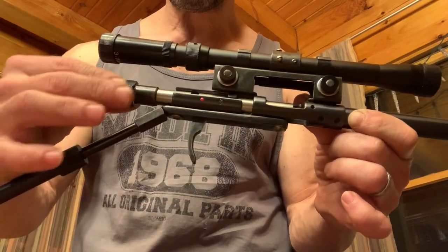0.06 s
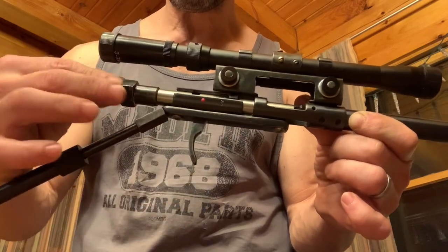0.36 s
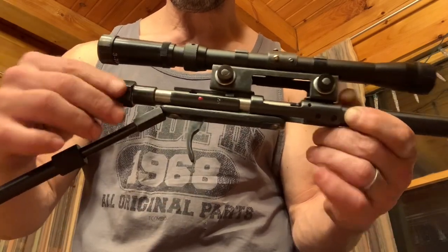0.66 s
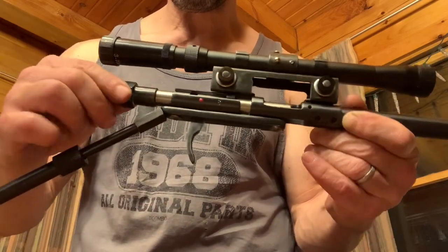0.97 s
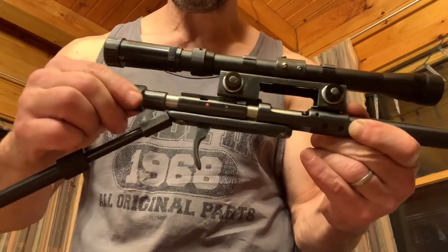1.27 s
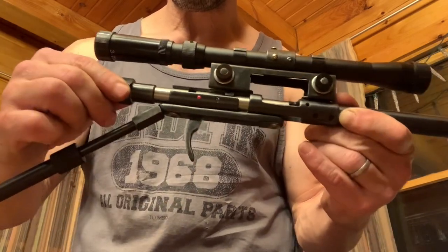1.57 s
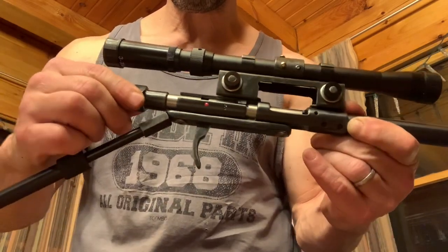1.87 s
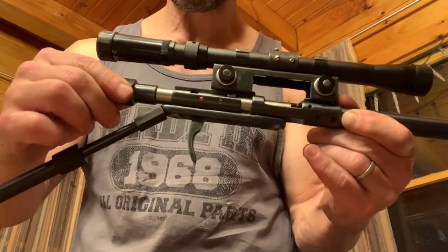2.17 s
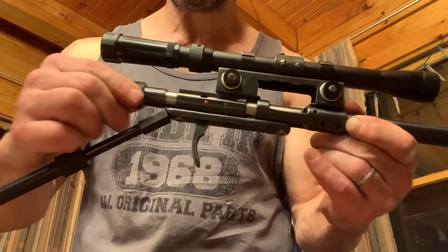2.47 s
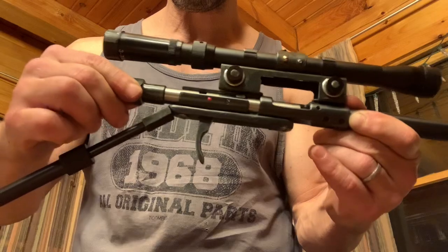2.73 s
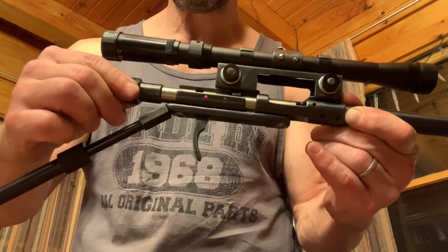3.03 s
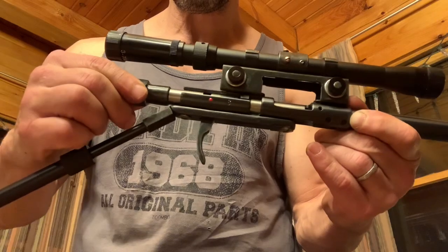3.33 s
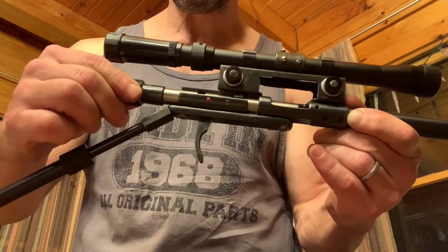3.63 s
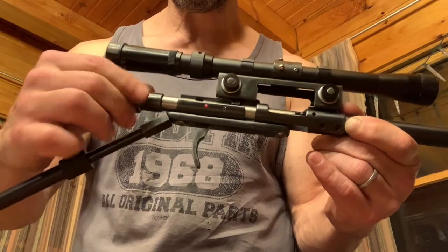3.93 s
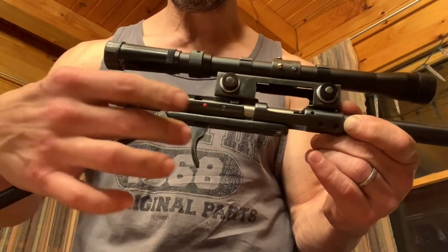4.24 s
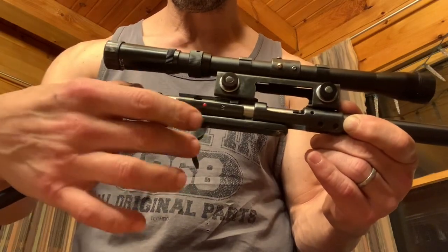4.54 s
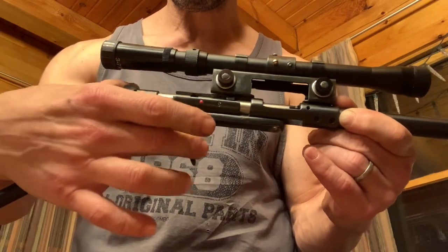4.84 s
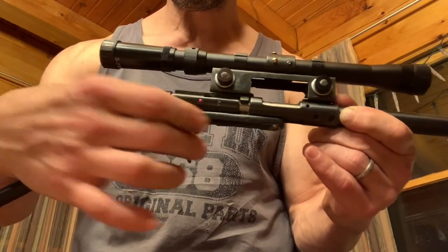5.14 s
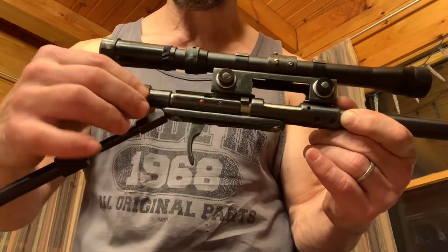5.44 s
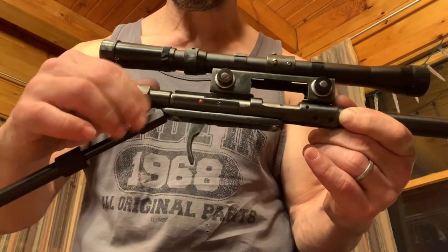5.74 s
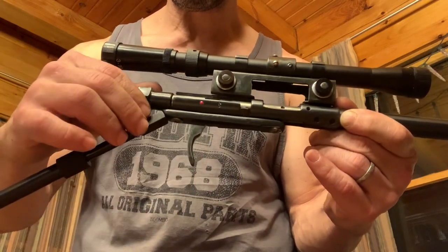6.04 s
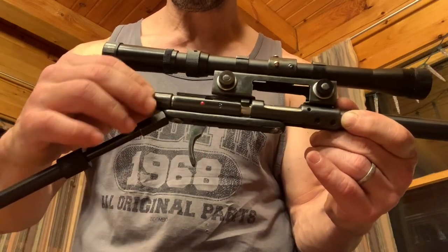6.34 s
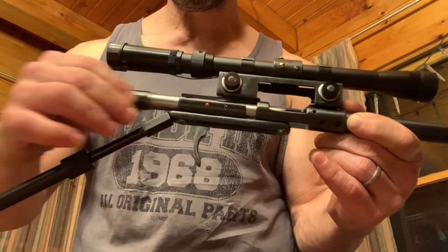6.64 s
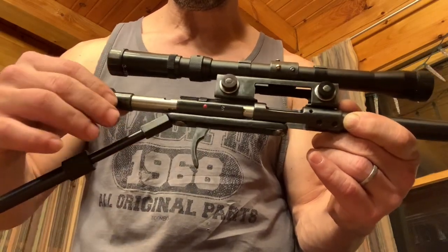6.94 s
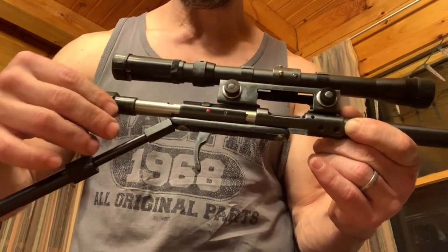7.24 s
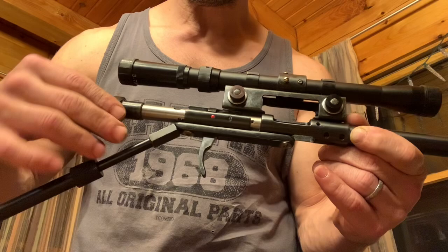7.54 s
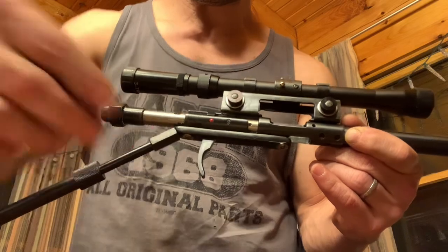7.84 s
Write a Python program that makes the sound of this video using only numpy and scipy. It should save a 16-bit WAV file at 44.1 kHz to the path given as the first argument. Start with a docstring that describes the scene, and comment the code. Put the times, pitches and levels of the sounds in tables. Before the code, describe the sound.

A rifle bolt is eased forward by hand, close to the microphone in a small wooden room. Steel slides softly with light clicks and dull knocks from the held rifle. The bolt closes with a hard click, another click and a very sharp snap follow, then it scrapes open and is drawn back. A faint bird chirps now and then, and a low hum comes and goes over a quiet, steady drone.

```python
"""A rifle bolt is worked by hand, close by, in a small wooden room with a quiet, steady drone.
First the bolt is eased forward: steel slides, clicks and rings, and the held rifle knocks softly.
From half a second on, a faint bird chirps now and then; from about 2 s a low hum comes and goes.
Near 5 s the bolt closes with a hard click, and the sharpest snap follows at 6.2 s.
Last, the opened bolt scrapes past its catch and is drawn back."""
import sys
import numpy as np
from scipy import signal
from scipy.fft import rfft, irfft, next_fast_len
from scipy.io import wavfile
from scipy.ndimage import uniform_filter1d

SR = 44100
rng = np.random.default_rng(int(sys.argv[2]) if len(sys.argv) > 2 else 0)


def generate_wav(signal):
    """Clip the signal to [-1, 1] and save it as 16-bit WAV at the path in sys.argv[1]."""
    frames = np.transpose(np.atleast_2d(signal))
    scaled = np.clip(frames, -1, 1) * 32767
    pcm = np.round(scaled).astype(np.int16)
    wavfile.write(sys.argv[1], SR, pcm)


N = 352800  # 8 seconds

# Steel hits steel. Brightness is the high tick compared with the middle clack.
# Slack runs from 0 (bolt locked) to 1 (bolt loose).
# start_s, level_db, bright_db, ring_db, slack, ping_hz, ping_db, top_treble_db
BOLT_CLICKS = [(1.178, -54, -14, -8, 0.9, 7300, -8, -6), (1.805, -48.5, -13, -6, 0.56, 8000, 0, 2),
               (1.971, -44.5, -2.5, -10, 0.71, 7360, 3, -4), (2.487, -44.5, -6, -15, 0.4, 7800, 5, 0),
               (2.4963, -42.5, -10, 1, 0.31, 7900, 10, -7), (3.7695, -46, -11, 0, 0.43, 7450, 5, -6),
               (4.476, -45, -1, -2, 0.17, 7730, 5, -4), (4.695, -44, 5.5, -4.5, 0.26, 9080, 6.5, -2),
               (4.96, -37.5, 10, -6, 0.29, 8900, -2, 2), (4.9907, -45, 17.5, -11, 0.11, 9610, 1.5, -4),
               (4.9933, -24, 7.5, -4, 0.055, 9650, 6, 3), (5.09, -41, 11.5, -11.5, 0.25, 9540, 1, 4),
               (5.6407, -28, -9, -10.5, 0.4, 8800, 1, 1.5), (5.7242, -35, -14.5, 6.5, 0.85, 9200, -3, -13),
               (5.7472, -42.5, -10.5, -5, 0.85, 8600, -5, -8), (6.201, -18.5, 2.5, 0, .025, 9560, 10.5, 3),
               (6.594, -28, 8, 10.5, 1, 9060, 10.5, 2.5), (6.704, -58, 10, -11, 0.7, 13000, 9, 1),
               (6.7144, -44, 7, -3, .62, 9600, 17, 1), (6.715, -55, 17, -9, 0.58, 12660, 7, 6),
               (7.274, -60.5, 3, -9.5, 0.65, 8760, -6, -2)]
# The tones the steel rings with. A t60 is the time a sound takes to fade by 60 dB.
# pitch_hz, locked_db, loose_db, t60_s
STEEL_TONES = [(630, -0.5, -15, 0.059), (805, -15, -11.5, .03), (1580, -25.5, -9, 0.036),
               (1940, -9, -28, 0.028), (2610, 1, -19, 0.054), (2880, -8.5, -21.5, 0.034),
               (2995, -11.5, -21, 0.022), (3740, -21, -5, 0.054), (5700, -18.5, 0.5, 0.013),
               (7000, -11.5, -30, .03), (7200, -11, -35, 0.025), (7790, -13.5, -28, 0.025),
               (8600, -10, -1, 0.0079), (10530, -13.5, -5, 0.034), (11010, -13, 2.5, 0.03),
               (12560, -5, 2, 0.011), (13480, -16.5, 0.5, 0.017), (15050, -7, -3.5, 0.016)]
# How strong the rattle in a click is, from bass to treble: pitch_hz, locked_db, loose_db
RATTLE_SHAPE = [(100, -28, -30.5), (298, -13.5, -19.5), (580, -0.5, -4), (775, -4.5, -3.5),
                (1180, -13.5, -11), (1610, -7.5, -2.5), (1840, -2, -12), (2150, -19, -11),
                (2600, 3.5, -2.5), (3110, -8.5, -6.5), (3750, -5, 6.5), (4700, -11.5, -5), (4870, -4, 3),
                (5730, -10, 1.5), (6850, -1.5, -4.5), (8350, -1, -7), (8660, 1, -0.5), (10100, -11.5, -6),
                (10800, -10.5, -5.5), (16000, -14, -5.5)]
CLICK_S = 0.35
THUD_DB, THUD_PER_BRIGHT = -12, -0.21  # a bright, glancing click has less thud
SNAP_DB, SNAP_PER_BRIGHT = 32, 0.4  # and more snap

# The bolt slides along its guide: start_s, rise_s, fade_s, level_db, centre_hz, width_octaves
BOLT_STROKES = [(.149, 0.014, 0.125, -43.5, 3470, 1.1), (0.402, 0.01, 0.03, -59, 2900, 0.81),
                (.44, .03, .05, -56, 3200, .95), (1.45, 0.088, 0.28, -66.5, 1860, 0.94),
                (1.756, 0.029, 0.023, -62.5, 2920, 0.84), (1.97, 0.07, 0.15, -58.5, 3660, 1),
                (2.317, 0.0026, 0.06, -58, 2350, 0.62), (2.462, 0.033, 0.0095, -53, 3300, 1.1),
                (3.228, 0.0093, 0.063, -63.5, 2740, 0.6), (3.77, 0.15, 0.29, -63.5, 1620, 0.54),
                (4.653, .0034, 0.17, -57, 2495, 0.77), (6.498, 0.014, 0.08, -59.5, 2960, .6),
                (7.087, 0.0053, 0.11, -50.5, 3570, 1.02), (5.58, .01, 0.061, -64.5, 4450, 0.71),
                (7.695, 0.025, 0.028, -49.5, 3500, 1.2)]
# Harsh scrapes as the bolt passes its catch: start_s, rise_s, fade_s, level_db, centre_hz
CATCH_SCRAPES = [(4.96, 0.022, 0.027, -39, 5100), (6.586, 0.0096, 0.0027, -33, 9500),
                 (6.672, 0.014, 0.024, -45, 1690)]
SCRAPE_OCTAVES = 3
# Thin squeaks of steel: start_s, level_db, centre_hz
STEEL_SQUEAKS = [(2.065, -49.5, 5370), (2.115, -57, 3740), (4.927, -59, 4440), (6.951, -62.5, 5870),
                 (7.172, -55, 5000)]
SQUEAK_RISE_S, SQUEAK_FADE_S, SQUEAK_OCTAVES = 0.0036, 0.023, 0.16
# The hand rubs on the rifle: start_s, level_db
HAND_RUBS = [(1.39, -58.5), (4.531, -54.5), (4.945, -50.5), (4.99, -49), (6.653, -57)]
RUB_RISE_S, RUB_FADE_S, RUB_HZ, RUB_OCTAVES = 0.021, 0.035, 233, 0.75

# Dull knocks of the held rifle: start_s, level_db
RIFLE_KNOCKS = [(.821, -49), (1.237, -50.5), (1.825, -49.5), (2.498, -41.5), (4.921, -56), (4.983, -35.5),
                (4.996, -37.5), (6.209, -37.5), (6.681, -46), (6.692, -46.5)]
# The tones of the rifle's frame: multiple_of_lowest_pitch, level_db, t60_s
FRAME_TONES = [(1, 5.5, 0.06), (1.1, -2.5, 0.097), (2, -3.5, 0.016), (3.25, -17, 0.06),
               (4.749, -8.5, 0.013), (5.5, -2.5, .018)]
FRAME_HZ, PRESSED_FRAME_HZ = 714, 807  # the lowest pitch rises while the palm presses
PALM_START_S, PALM_END_S = 4.3, 5.2

# Bird whistles that slide down, then hold: start_s, length_s, last_hz, level_db, overtone_db
BIRD_SLURS = [(0.569, 0.16, 1490, -57, -8), (2.461, 0.17, 1370, -57.5, -24),
              (3.613, 0.16, 1614, -58, -16.5), (5.999, 0.22, 2175, -55, -20), (7.239, 0.125, 1880, -55, -9)]
SLUR_TOP_HZ, SLUR_OCTAVES_PER_S, SLUR_STEPS_PER_S, SLUR_SWELL_DB = 5214, 12, 26, 11.5
# Short, gliding chirps: start_s, length_s, first_hz, last_hz, level_db, roughness (0 to 1)
BIRD_CHIRPS = [(0.514, 0.052, 1622, 1655, -55.5, 0.27), (0.644, 0.036, 3680, 4700, -57, .5),
               (0.722, 0.044, 3760, 3290, -54, 0.59), (0.948, 0.097, 1947, 1496, -64, 0.54),
               (0.952, 0.094, 3580, 2605, -63.5, 0.44), (1.039, 0.036, 3180, 3310, -62.5, 0.5),
               (1.045, 0.13, 2370, 1670, -60, 0.77), (2.549, .06, 3280, 2710, -61, 0.64),
               (2.61, 0.035, 2870, 3145, -56.5, 0.26), (2.854, 0.059, 3510, 2200, -63, 0.76),
               (2.897, 0.038, 2745, 2850, -56, 0.97), (2.944, .055, 2290, 2194, -55.5, 0.75),
               (3.283, 0.049, 1560, 1900, -60.5, 0.6), (5.316, 0.071, 1747, 1560, -64, 0.43),
               (5.319, 0.043, 3515, 3280, -62.5, 0.36), (6.415, 0.18, 2960, 2825, -66, 0.48),
               (6.498, 0.12, 1482, 1423, -60.5, 0.95), (6.846, 0.048, 1667, 2250, -57.5, 0.8),
               (6.881, 0.042, 2128, 1740, -57, 0.8), (7.326, 0.045, 4500, 4030, -53.5, 0.62),
               (7.382, 0.04, 3940, 3800, -47.5, 0.17)]
# Hoarse, sinking calls with two voices at once: start_s, length_s, middle_hz, level_db
BIRD_CHATTER = [(0.704, 0.06, 2028, -56.5), (1.909, 0.13, 2535, -61), (2.629, 0.063, 2136, -55),
                (3.754, 0.081, 1975, -60.5), (4.376, 0.11, 1997, -65.5), (4.69, 0.16, 1728, -59),
                (7.376, 0.055, 1883, -55.5)]
SECOND_VOICE_RATIO, SECOND_VOICE_DB = 1.6, -2.5
SQUAWK_START_S, SQUAWK_DB = 2.918, -41.5

# Swells of the low hum: start_s, length_s, pitch_hz, level_db
HUM_SWELLS = [(1.85, 0.055, 112.5, -43.5), (1.96, 0.081, 122.6, -42.5), (2.515, 0.14, 122.5, -35),
              (2.641, .12, 129.3, -40), (3.276, 0.053, 120, -42), (5.055, 0.14, 114.7, -47),
              (6.481, 0.079, 115.7, -41), (6.548, .12, 116.8, -42.5)]
# Soft, low bumps, all of one length and pitch: start_s, level_db
LOW_BUMPS = [(3.06, -55), (3.635, -50.5), (3.786, -50), (4.983, -41.5), (5.02, -38), (6.208, -52.5),
             (6.72, -49)]
BUMP_S, BUMP_HZ = 0.031, 87.3

# The ringing parts face the listener, so less of their pitch reaches the walls: pitch_hz, gain_db
STEEL_TO_WALLS = [(620, -4), (1500, 2), (2900, -4), (7000, 0), (9500, -6), (11000, -3), (15000, 0)]
# How long the room's echo lasts: pitch_hz, t60_s
ECHO_TIMES = [(150, 0.59), (700, 0.48), (2800, 0.43), (6000, 0.33), (10000, 0.33), (16000, 0.12)]
# The noise of the still room, from bass to treble: pitch_hz, level_db
AIR_SHAPE = [(25, -19.5), (45, -1), (75, 3.5), (100, -3), (120, 5.5), (160, 2.5), (260, -1.5), (370, 2),
             (500, -6), (1000, -10), (3000, -18), (7000, -22), (16000, -24.5)]


def bolt_clicks():
    """Steel parts strike each other as the bolt moves; each hit has its own strength and brightness."""
    out = np.zeros(N)
    for start_s, db, bright_db, ring_db, slack, ping_hz, ping_db, top_db in BOLT_CLICKS:
        struck_part = amp(ping_db) * ping(ping_hz, slack, palm_presses(start_s))
        sound = click(bright_db, ring_db, slack, struck_part)
        # Each click has its own amount of top treble.
        sound = colour(sound, [(9600, 0), (11000, top_db)])
        # Set each click's thud, clack and high tick; bright clicks have less thud.
        thud_db = db + THUD_DB + THUD_PER_BRIGHT * bright_db
        bands = [(400, 1200, thud_db), (1200, 6000, db), (6000, 16000, db + bright_db)]
        add(out, start_s, set_band_levels(sound, bands))
    return out


def click(bright_db, ring_db, slack, struck_part, crack_t60=0.02, rattle_t60=0.062, rise_s=0.00076):
    """Steel touches, snaps into place, rattles and rings; the slack of the bolt changes its tone."""
    t = seconds(CLICK_S)
    contact = (fade(t, crack_t60, db=16) + fade(t, rattle_t60, db=8)) * rng.standard_normal(len(t))
    snap_sample = round(0.00092 * SR)  # just after the first touch
    contact[snap_sample] += amp(SNAP_DB + SNAP_PER_BRIGHT * bright_db)
    shape = [(hz, locked + slack * (loose - locked)) for hz, locked, loose in RATTLE_SHAPE]
    tones = [(hz, locked + slack * (loose - locked), t60) for hz, locked, loose, t60 in STEEL_TONES]
    sound = colour(contact, shape) + amp(ring_db) * ring(t, tones) + struck_part
    return travel_through_steel(sound * (1 - np.exp(-t / rise_s)))


def ping(hz, slack, held, free_t60=0.055, damped_t60=0.007, linger_t60=0.8):
    """A small struck part rings briefly; it sings on only with the bolt locked and the palm away."""
    t = seconds(CLICK_S)
    freedom = 0 if held else np.exp(-slack / 0.12)
    t60 = damped_t60 + freedom * (free_t60 - damped_t60)
    flash = free_t60 / t60 * fade(t, t60)  # a shorter flash starts louder
    afterring = freedom * fade(t, linger_t60, db=-44)
    return (flash + afterring) * np.sin(2 * np.pi * hz * t)


def ring(t, tones, pitch_spread=0.005):
    """The fading tones of a struck part; the grip and the spot hit change them a little each time."""
    out = np.zeros(len(t))
    for hz, db, t60 in tones:
        loudness = fade(t, t60, db + rng.normal(0, 1))
        wave = np.sin(2 * np.pi * hz * rng.normal(1, pitch_spread) * t)
        out += loudness * wave * rng.choice([-1, 1])
    return out


def travel_through_steel(x, lag_scale_s=0.002406):
    """Bending waves in steel carry treble faster than bass, so the low part of a click comes later."""
    khz = np.fft.rfftfreq(2 * len(x), 1 / SR) / 1000
    delay_s = lag_scale_s * np.maximum(1 / np.sqrt(khz + 0.5) - 1 / 3, 0)
    phase_lag = np.pi * np.cumsum(delay_s) * SR / len(x)
    return irfft(rfft(x, 2 * len(x)) * np.exp(-1j * phase_lag))[:len(x)]


def friction(grain_db=2.5, steel_db=-18, dull_above_hz=7790, fall_db_per_octave=18):
    """Sliding surfaces make a spray of tiny slips, heard as a hiss that also sets the steel ringing."""
    out = np.zeros(N)
    steel = ring(seconds(0.1), [(hz, locked, t60) for hz, locked, _, t60 in STEEL_TONES])
    hz = np.geomspace(100, 20000, 40)
    treble_db = -fall_db_per_octave * np.maximum(np.log2(hz / dull_above_hz), 0)
    moves = BOLT_STROKES + [(*row, SCRAPE_OCTAVES) for row in CATCH_SCRAPES]
    for start_s, db, centre_hz in STEEL_SQUEAKS:
        moves.append((start_s, SQUEAK_RISE_S, SQUEAK_FADE_S, db, centre_hz, SQUEAK_OCTAVES))
    for start_s, db in HAND_RUBS:
        moves.append((start_s, RUB_RISE_S, RUB_FADE_S, db, RUB_HZ, RUB_OCTAVES))
    for start_s, rise_s, fade_s, db, centre_hz, octaves in moves:
        t = seconds(rise_s + 2 * fade_s)
        slips = unit(rng.standard_normal(len(t)) * amp(grain_db * wander(len(t), 900)))
        ringing = unit(signal.fftconvolve(slips, steel)[:len(t)])
        # The hiss is strongest at its centre pitch and falls away on both sides.
        hump_db = -36 * np.log10(1 + (np.log2(hz / centre_hz) / octaves) ** 2 / 2)
        hiss = unit(colour(slips + amp(steel_db) * ringing, np.c_[hz, treble_db + hump_db]))
        rise = np.minimum(t / rise_s, 1)
        fall = np.exp(-2 * (np.maximum(t - rise_s, 0) / fade_s) ** 2)
        add(out, start_s, amp(db) * rise * fall * hiss)
    return out


def knocks(rise_s=0.00026):
    """The rifle's frame gives dull knocks, which the hands soon muffle."""
    out = np.zeros(N)
    t = seconds(0.2)
    for start_s, db in RIFLE_KNOCKS:
        lowest_hz = PRESSED_FRAME_HZ if palm_presses(start_s) else FRAME_HZ
        tones = [(lowest_hz * multiple, tone_db, t60) for multiple, tone_db, t60 in FRAME_TONES]
        add(out, start_s, amp(db) * ring(t, tones) * (1 - np.exp(-t / rise_s)))
    return out


def palm_presses(time_s):
    """Tells whether the palm lies on the steel at this moment."""
    return PALM_START_S < time_s < PALM_END_S


def bird(dull_above_hz=8500):
    """A bird whistles, chirps, chatters and squawks once; distance dulls its treble."""
    out = np.zeros(N)
    for start_s, length_s, last_hz, db, overtone_db in BIRD_SLURS:
        t = seconds(length_s)
        step_speed = 2 * np.pi * SLUR_STEPS_PER_S
        stepped_time = t + np.sin(step_speed * t) / step_speed  # the pitch falls in little steps
        hz = np.maximum(SLUR_TOP_HZ * 2 ** (-SLUR_OCTAVES_PER_S * stepped_time), last_hz)
        swell = amp(db + SLUR_SWELL_DB * (t / length_s - 0.5))
        add(out, start_s, swell * whistle(hz, rough=0.38, overtone_db=overtone_db))
    for start_s, length_s, first_hz, last_hz, db, rough in BIRD_CHIRPS:
        hz = np.geomspace(first_hz, last_hz, len(seconds(length_s)))
        add(out, start_s, amp(db) * whistle(hz, rough, overtone_db=-20))
    for start_s, length_s, middle_hz, db in BIRD_CHATTER:
        hz = sinking_pitch(middle_hz, length_s)
        for ratio, voice_db in [(1, 0), (SECOND_VOICE_RATIO, SECOND_VOICE_DB)]:
            add(out, start_s, amp(db + voice_db) * whistle(ratio * hz, rough=1, overtone_db=-11))
    hz = sinking_pitch(middle_hz=2190, length_s=0.045)
    squawk = whistle(hz, rough=0.55, overtone_db=-1, flicker_db=-4.5, upper_db=-2.5)
    add(out, SQUAWK_START_S, amp(SQUAWK_DB) * squawk * signal.windows.cosine(len(squawk)))
    return signal.sosfilt(signal.butter(3, dull_above_hz, fs=SR, output="sos"), out)


def whistle(hz, rough, overtone_db, flicker_db=3.5, upper_db=-6, waver=0.059, rasp=0.1, edge_s=0.011):
    """One bird note with five overtones follows a pitch curve; fast flutter makes it hoarse."""
    size = len(hz)
    hz = hz * (1 + waver * rough * wander(size, 72) + rasp * rough * wander(size, 550))
    phase = 2 * np.pi * np.cumsum(hz) / SR
    tone = sum(amp(k * overtone_db + upper_db * max(k - 1, 0)) * np.sin((k + 1) * phase)
               for k in range(6))
    flutter = 1 + rough * wander(size, 890)
    flicker = amp(flicker_db * wander(size, 43))
    soft_edges = signal.windows.tukey(size, 2 * edge_s * SR / size)
    return unit(tone * flutter * flicker) * soft_edges


def sinking_pitch(middle_hz, length_s, octaves_per_s=1.3):
    """The pitch of a call that sinks steadily."""
    return middle_hz * 2 ** (-octaves_per_s * (seconds(length_s) - length_s / 2))


def low_hum(overtone_db=-24, boom_hz=127, boom_t60=1.0, boom_db=-6):
    """Low, nearly pure swells and bumps; the room booms along at a bass note of its own."""
    loudness, pitch_hz = np.zeros(N), np.zeros(N)
    bumps = [(start_s, BUMP_S, BUMP_HZ, db) for start_s, db in LOW_BUMPS]
    for start_s, length_s, hz, db in sorted(HUM_SWELLS + bumps):
        swell = np.sin(np.pi * seconds(length_s) / length_s)
        add(loudness, start_s, np.sqrt(2) * amp(db) * swell)
        pitch_hz[round(start_s * SR):][:len(swell)] = hz
    phase = 2 * np.pi * np.cumsum(pitch_hz) / SR
    overtones = (np.sin(2 * phase) + np.sin(3 * phase)) * wander(N, 34)
    hum = loudness * (np.sin(phase) + amp(overtone_db) * overtones)
    t = seconds(1)
    decay = fade(t, boom_t60)
    boom = 2 * decay * np.cos(2 * np.pi * boom_hz * t) / decay.sum()
    return hum + amp(boom_db) * signal.fftconvolve(hum, boom)[:N]


def shifting_echo(x, cycle_s=2.3, patterns=4):
    """Hands and rifle keep moving, so one pattern of echoes blends into the next."""
    turns = np.arange(N) / SR / cycle_s
    shares = (np.maximum(np.cos(2 * np.pi * (turns + k / patterns)), 0) for k in range(patterns))
    return sum(wall_echo(x * share) for share in shares)


def wall_echo(x, first_s=0.004, build_s=0.0025, density=0.15):
    """Sound bounces many times off the wooden walls; the treble dies sooner than the bass."""
    build_up = np.clip((seconds(1) - first_s) / build_s, 0, 1)
    bounces = rng.standard_normal(SR) * (rng.random(SR) < density) * build_up
    hz, t, bands = signal.stft(bounces, SR, nperseg=256)
    decay = fade(t, look_up(ECHO_TIMES, hz)[:, None])
    _, tail = signal.istft(bands * decay, SR, nperseg=256)
    return signal.fftconvolve(x, tail / np.linalg.norm(tail))[:N]


def room_tone(air_db=-62.5, drone_hz=121.3, drone_db=-68.5):
    """Soft air noise and the wavering drone of an appliance."""
    air = unit(colour(rng.standard_normal(N), AIR_SHAPE)) * amp(0.5 * wander(N, 2.6))
    phase = 2 * np.pi * drone_hz * np.arange(N) / SR + 0.22 * wander(N, 4.1)
    return amp(air_db) * air + amp(drone_db) * np.sqrt(2) * np.sin(phase)


def amp(db):
    """Turns decibels into a number to multiply by."""
    return 10 ** (np.asarray(db) / 20)


def fade(t, t60, db=0):
    """A loudness curve that starts at db and drops 60 dB every t60 seconds."""
    return amp(db - 60 * t / t60)


def unit(x):
    """Scales a signal to an average level (rms) of 1."""
    return x / np.sqrt(np.mean(x ** 2) + 1e-20)


def seconds(length_s):
    """The time of each sample in a sound."""
    return np.arange(int(length_s * SR)) / SR


def add(mix, start_s, sound):
    """Mixes a sound in at its start time."""
    part = mix[max(round(start_s * SR), 0):][:len(sound)]
    part += sound[:len(part)]


def wander(size, hz):
    """A random wobble of average size 1; hz sets roughly how fast it can move."""
    padded = size + SR // 4
    keep_slow = np.exp(-(np.fft.rfftfreq(padded, 1 / SR) / hz) ** 2)
    return unit(irfft(rfft(rng.standard_normal(padded)) * keep_slow))[:size]


def look_up(points, hz):
    """Reads between the rows of a (pitch_hz, value) table, with octaves evenly spaced."""
    table_hz, values = np.transpose(points)
    return np.interp(np.log(hz + 1), np.log(table_hz + 1), values)


def colour(x, points):
    """Turns pitches up or down by a (pitch_hz, gain_db) table, with no ringing ahead of a hit."""
    size = next_fast_len(len(x) + 4096)
    log_gain = np.log(amp(look_up(points, abs(np.fft.fftfreq(size, 1 / SR)))))
    response = np.exp(np.conj(signal.hilbert(log_gain)))
    return np.fft.ifft(np.fft.fft(x, size) * response).real[:len(x)]


def set_band_levels(x, bands):
    """Brings the loudest moment of each (low_hz, high_hz, level_db) band close to its level."""
    gains = []
    for low_hz, high_hz, db in bands:
        band = signal.sosfilt(signal.butter(3, [low_hz, high_hz], "band", fs=SR, output="sos"), x)
        peak = np.sqrt(uniform_filter1d(band ** 2, 256).max())
        gains.append((np.sqrt(low_hz * high_hz), db - 20 * np.log10(peak)))
    return colour(x, gains)


def scene(bolt_echo_db=-9, knock_echo_db=-16, slide_echo_db=-6, bird_direct_db=-2, bird_echo_db=-5):
    """The rifle is near and has little echo; much of the bird's sound comes by way of the walls."""
    steel, frame, rubbing, song = bolt_clicks(), knocks(), friction(), bird()
    direct = steel + frame + rubbing + amp(bird_direct_db) * song
    to_walls = (amp(bolt_echo_db) * colour(steel, STEEL_TO_WALLS) + amp(knock_echo_db) * frame
                + amp(slide_echo_db) * rubbing + amp(bird_echo_db) * song)
    return (direct + shifting_echo(to_walls) + low_hum() + room_tone())[None]


def record(dry, low_cut_hz=41.5, high_cut_hz=16100):
    """Takes away the deepest bass and the highest treble."""
    bass_cut = signal.butter(5, low_cut_hz, "high", fs=SR, output="sos")
    treble_cut = signal.firwin(301, high_cut_hz, window=("kaiser", 9), fs=SR)
    return signal.oaconvolve(signal.sosfilt(bass_cut, dry), treble_cut[None], "same")


dry = scene()
out = record(dry)
generate_wav(out)
```